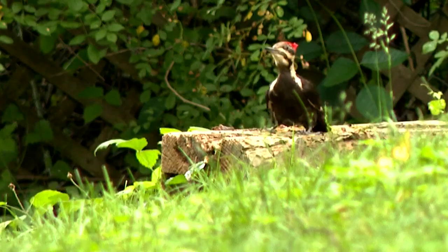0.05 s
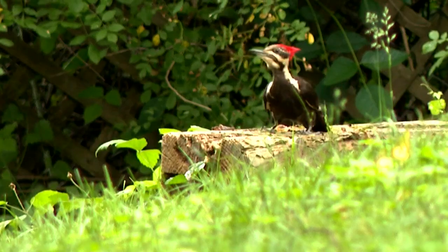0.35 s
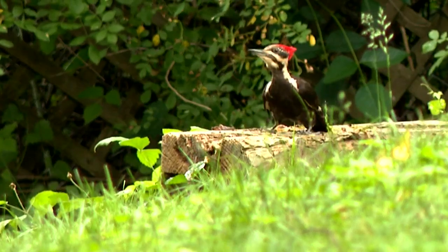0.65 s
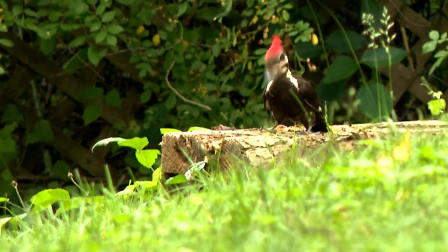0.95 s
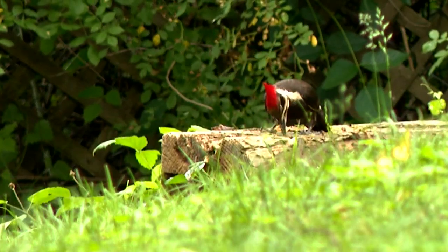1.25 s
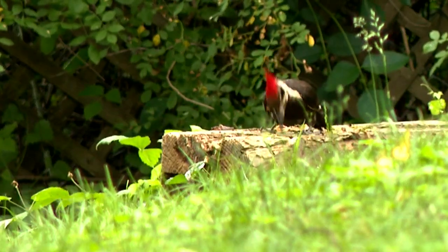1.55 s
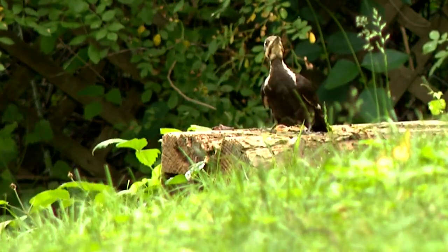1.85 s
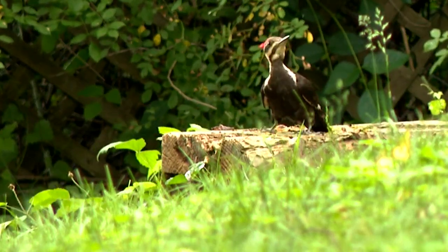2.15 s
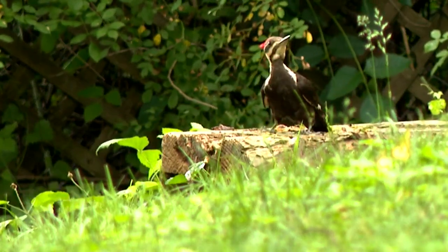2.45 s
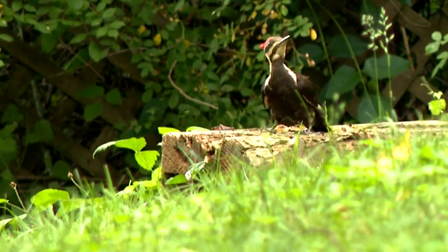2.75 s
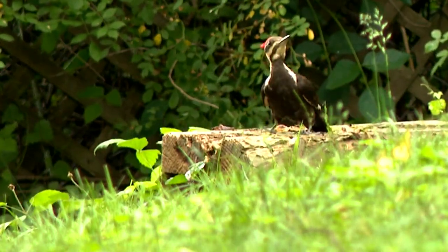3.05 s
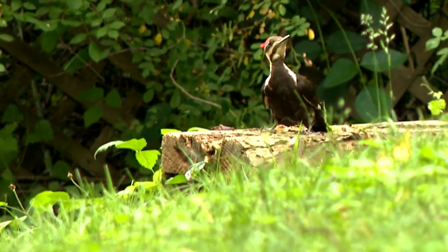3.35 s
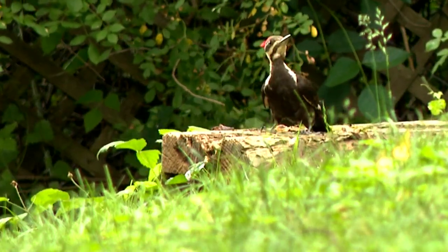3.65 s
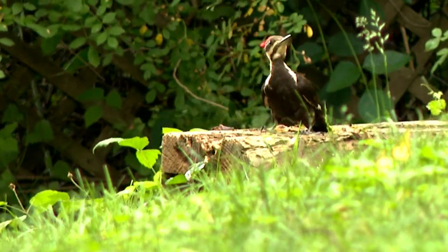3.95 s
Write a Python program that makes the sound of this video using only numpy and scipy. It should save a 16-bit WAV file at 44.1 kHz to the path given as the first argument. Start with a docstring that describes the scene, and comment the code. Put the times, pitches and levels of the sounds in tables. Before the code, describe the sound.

A small bird sings five quick, whistled phrases with raspy edges from about 0.3 to 1.5 seconds, echoing softly among trees. A woodpecker taps a stump once, lightly, near 1.9 seconds. Other birds give thin, high calls around 0.8, 1.7, 2.7 and 3.8 seconds. Bark and leaves rustle faintly now and then. Soft outdoor hiss, light wind rumble on the microphone and a faint distant hum continue throughout.

```python
"""Wren-like song among trees

A bird sings five quick phrases made of a rasp, a high arch, a rising note, a falling slur and a low link.
Foliage scatters the song into a soft tail. Small birds add thin high calls, bark and leaves rustle,
and a woodpecker taps once on a stump. Underneath lie outdoor hiss, light wind and a faint distant drone."""
import sys
import numpy as np
from scipy import signal
from scipy.fft import rfft, irfft
from scipy.io import wavfile
from scipy.ndimage import uniform_filter1d

SR = 44100
rng = np.random.default_rng(int(sys.argv[2]) if len(sys.argv) > 2 else 0)


def master(y):
    """Save y as 16-bit WAV."""
    cut = np.clip(np.atleast_2d(y).T, -1, 1)
    pcm = np.round(cut * 32767)  # scale
    wavfile.write(sys.argv[1], SR, pcm.astype(np.int16))


N = 176400  # 4 seconds
TOP_HZ = 15720  # upper limit of the sound


def amp(db):
    """Turns decibels into a number to multiply by."""
    return 10 ** (np.asarray(db) / 20)


def unit(x):
    """Scales a sound to an average strength (rms) of 1."""
    return x / np.sqrt(np.mean(x ** 2) + 1e-20)


def read(points, hz):
    """Looks up a value between a table's frequencies, spaced by octaves."""
    f, value = np.transpose(points)
    return np.interp(np.log(hz + 1), np.log(f + 1), value)


def add(mix, start_s, sound):
    """Mixes a sound in at the given time."""
    part = mix[max(round(start_s * SR), 0):][:len(sound)]
    part += sound[:len(part)]


def tint(x, colour):
    """Turns each frequency up or down as the colour table says."""
    return irfft(rfft(x) * amp(read(colour, np.fft.rfftfreq(len(x), 1 / SR))), len(x))


def noise(colour):
    """Steady noise with the given balance of low and high."""
    return unit(tint(rng.standard_normal(N), colour))


def drift(size, fastest_hz):
    """A smooth random wobble made of 12 sine waves."""
    f, t = np.geomspace(fastest_hz / 8, fastest_hz, 12)[:, None], np.arange(size) / SR
    return np.sin(2 * np.pi * (f * t + rng.random((12, 1)))).sum(0) / np.sqrt(len(f) / 2)


# Tone colour of the open air (frequency [Hz], level [dB])
HISS_COLOUR = [(35, -27), (55, -1), (100, -1), (160, -2.5), (230, -5.5), (400, -7.5), (750, -8),
               (1100, -12.5), (1600, -15.5), (2500, -16), (3900, -17), (5500, -19.5), (7200, -20),
               (8200, -24.5), (11000, -31.5), (15500, -39.5)]
def hiss():
    """Soft, almost steady outdoor hiss."""
    return amp(-56 + 0.22 * drift(N, 5)) * noise(HISS_COLOUR)


# Tone colour of the wind (frequency [Hz], level [dB])
WIND_COLOUR = [(3, 0.5), (10, 5.5), (20, 10), (32, -10.5), (50, -6.5), (100, -52), (300, -79)]
# Gusts and lulls (time [s], level [dB])
GUSTS = [(0, -53.5), (.3, -48.5), (.7, -54), (1.3, -51), (1.85, -49), (2.25, -57), (2.7, -47.5), (3.4, -56),
         (4, -47)]
def wind():
    """Light wind on the microphone makes a deep rumble."""
    gust_db = np.interp(np.arange(N) / SR, *np.transpose(GUSTS))
    return amp(gust_db) * noise(WIND_COLOUR)


# Tones of the drone (pitch [Hz], start level [dB], middle level [dB], end level [dB])
DRONE_TONES = [(57, -85, -83, -55.5), (85.8, -74, -68, -65), (119.2, -61.5, -71, -63.5),
               (174.6, -63.5, -81.5, -70), (202, -77, -67, -60.5), (306, -89, -80, -71),
               (392.5, -78, -81, -66)]
def drone():
    """A distant hum of low tones that wander in pitch and level."""
    out, t = np.zeros(N), np.arange(N) / SR
    for hz, *levels in DRONE_TONES:
        db = np.interp(t, np.linspace(0, t[-1], len(levels)), levels) + 2 * drift(N, 4)
        pitch = hz * (1 + 0.0118 * drift(N, 5))
        out += amp(db) * np.sin(2 * np.pi * np.cumsum(pitch) / SR)
    return out


# Overtone strength next to the main tone (frequency [Hz], level [dB])
BIRD_OVERTONES = [(3500, -40), (5000, -38), (7300, -28), (9000, -41), (10500, -36), (11200, -28.5),
                  (12200, -32), (13500, -26), (15500, -35)]
def whistle(hz, db, overtone_db=0, harmonics=3):
    """A bird's nearly pure, wavering tone, with weak overtones at multiples of its pitch."""
    waver, shimmer_db, fade_s = 0.0021, 1.2, 0.0014
    size = len(hz)
    t = np.arange(size) / SR
    phase = 2 * np.pi * np.cumsum(hz * (1 + waver * drift(size, 290))) / SR
    tone = np.sin(phase)
    for k in range(2, harmonics + 1):
        tone += amp(read(BIRD_OVERTONES, k * hz) + overtone_db) * (k * hz < TOP_HZ) * np.sin(k * phase)
    fade = np.sin(np.pi / 2 * np.clip(np.minimum(t, t[-1] - t) / fade_s, 0, 1))
    return tone * fade * amp(db + shimmer_db * drift(size, 252))


def notes(rows, shape, overtone_db=0, harmonics=6):
    """Sings one note shape for each row; overtones fade as the pitch drops below its peak."""
    fade_db_per_octave = 21
    out, (at, hz, db) = np.zeros(N), np.transpose(shape)
    for start, length, ratio, level_db in rows:
        progress = np.linspace(0, 1, int(length * SR))
        pitch = uniform_filter1d(np.interp(progress, at, hz), size=130, mode="nearest")  # round corners
        bright_db = overtone_db + fade_db_per_octave * np.log2(pitch / pitch.max())
        note_db = np.interp(progress, at, db) + level_db
        add(out, start, whistle(pitch * ratio, note_db, bright_db, harmonics))
    return out


# Leaves scatter the highest pitches most (frequency [Hz], level [dB])
LEAF_COLOUR = [(1500, -2), (2500, -2), (3700, 1), (8000, 0), (11000, 7.5), (15000, 7)]
# How long the trees echo (frequency [Hz], time to fade by 60 dB [s])
TREE_FADE = [(1500, 0.96), (2500, 0.6), (4000, 1), (8000, 0.67), (15000, 0.32)]
def foliage(x, near_db, near_fade_s, tail_db):
    """Adds quick echoes from nearby leaves and trunks, then a long soft tail from the trees."""
    t = np.arange(SR) / SR
    near, far = rng.standard_normal((2, SR)) * (rng.random((2, SR)) < .06) * np.minimum(t / 0.0082, 1)
    near = tint(unit(near * amp(-60 * t / near_fade_s)), LEAF_COLOUR)
    hz, at, bands = signal.stft(far, SR, nperseg=256)
    bands *= amp(-60 * at / read(TREE_FADE, hz)[:, None])
    tail = signal.istft(bands, SR, nperseg=256)[1][:SR]
    echo = amp(near_db) * near + amp(tail_db) * unit(tail)
    return x + signal.fftconvolve(x, echo / np.sqrt(SR))[:N]


# How each kind of note moves (progress [0 to 1], pitch [Hz], level [dB])
ARCH_CURVE = [(0, 3346, -3), (.1, 3674, 0.5), (.25, 3748, -5), (.42, 3733, 2.5), (.58, 3423, 1),
              (.72, 3110, 2.5), (.86, 2800, 0), (1, 2600, -12)]
RISE_CURVE = [(0, 2312, -15), (.17, 2281, -6.5), (.42, 2339, -6), (.66, 2480, -2.5), (.86, 2610, -2),
              (1, 2680, -17)]
SLUR_CURVE = [(0, 2917, -18), (.15, 3064, -7), (.36, 3002, -2.5), (.55, 2710, -1), (.75, 2410, -5.5),
              (.9, 2230, -8.5), (1, 2020, -14)]
LINK_CURVE = [(0, 1712, -12), (.2, 1847, -11), (.45, 2010, -7.5), (.6, 2095, -1.5), (.78, 1979, -5.5),
              (.9, 1843, -8), (1, 1690, -10)]
# When each kind is sung (start [s], length [s], pitch multiplier [ratio], level [dB])
ARCH_NOTES = [(.281, 0.031, 1.04, -46.5), (.556, 0.038, 1.001, -42.5), (.841, .033, 1.001, -40),
              (1.1215, .033, 1.001, -39.5), (1.402, 0.036, 0.98, -40)]
RISE_NOTES = [(.324, 0.025, 1.01, -38.5), (.601, .031, .995, -36), (.888, 0.033, .99, -36),
              (1.165, 0.0353, 1.01, -34), (1.449, 0.028, 1, -33)]
SLUR_NOTES = [(.374, 0.024, .975, -38.5), (.657, 0.024, .975, -41), (.942, 0.026, 1.001, -36),
              (1.219, .027, 1.001, -34), (1.502, 0.024, 1.005, -35)]
LINK_NOTES = [(.444, 0.051, 1, -43.5), (.727, 0.045, 1, -41), (1.003, .048, .97, -41.5),
              (1.29, 0.046, 1.033, -39.5)]
def song():
    """The bird whistles an arch, a rise and a slur five times, with a low link between phrases."""
    out = notes(ARCH_NOTES, ARCH_CURVE, overtone_db=3, harmonics=3)
    out += notes(RISE_NOTES, RISE_CURVE, overtone_db=-4)
    out += notes(SLUR_NOTES, SLUR_CURVE, overtone_db=-3, harmonics=4)
    out += notes(LINK_NOTES, LINK_CURVE, overtone_db=1, harmonics=7)
    entry_s, entry_db = 0.017, -5.5  # the very first note swells in
    sung_s = np.arange(N) / SR - ARCH_NOTES[0][0]
    out *= amp(entry_db * (1 - np.clip(sung_s / entry_s, 0, 1) ** 2))
    return foliage(out, near_db=-9, near_fade_s=0.19, tail_db=-6.5)


# Small scrapes (start [s], length [s], level [dB])
SCRAPES = [(0.465, 0.021, -59), (0.924, 0.023, -53.5), (1.32, 0.013, -65), (1.715, 0.075, -61),
           (1.76, 0.15, -63), (2.612, 0.017, -62.5), (2.63, .016, -74), (2.973, 0.099, -75),
           (3.227, .11, -66), (3.873, 0.044, -70)]
# Their tone colour (frequency [Hz], level [dB])
SCRAPE_COLOUR = [(300, -20), (1100, -5), (1600, 16), (2000, -2), (3000, -3), (7000, 1), (10000, -3.5),
                 (14000, -4), (16000, -18)]
def rustles():
    """Dry bark and leaves scrape in short, grainy puffs of noise."""
    swells, grain_db = np.zeros(N), 2.8
    for start, length, db in SCRAPES:
        add(swells, start, amp(db) * np.sin(np.linspace(0, np.pi, int(length * SR))))
    return swells * noise(SCRAPE_COLOUR) * amp(grain_db * drift(N, 500))


# Rasps that open every phrase after the first (start [s], level [dB])
RASP_TIMES = [(0.535, -51.5), (.816, -48.5), (1.098, -47), (1.377, -49)]
# Tone colour of their dry, hissy edge (frequency [Hz], level [dB])
EDGE_COLOUR = [(2000, -35), (4500, -5), (7000, -4), (9000, -12), (11000, -8), (12000, -2.5), (13200, -16),
               (15500, -21)]
def rasps():
    """The bird overlaps four rough up-and-over chirps, each a little lower, with a puff of hiss."""
    chirp_s, spacing_s, roughness = 0.01386, 0.0047, .06
    low_hz, top_hz, sink_hz = 3015, 5180, 220
    edge_db, edge_s = -13, 0.033
    chirps, edge = np.zeros((2, N))
    progress = np.linspace(0, 1, int(chirp_s * SR))
    swell_db = -10 * (1 - np.sin(np.pi * progress))
    for start, db in RASP_TIMES:
        add(edge, start, amp(db + edge_db) * np.sin(np.linspace(0, np.pi, int(edge_s * SR))))
        for k in range(4):
            hz = low_hz + (top_hz - k * sink_hz - low_hz) * np.sin(2.27 * progress)
            hz *= 1 + roughness * drift(len(hz), 900)
            add(chirps, start + k * spacing_s, whistle(hz, db + swell_db, overtone_db=-2))
    return foliage(chirps + edge * noise(EDGE_COLOUR), near_db=-5.5, near_fade_s=0.15, tail_db=-6)


def glides(rows, roughness=0):
    """Straight pitch slides that swell and fade; roughness shakes the pitch into a buzz."""
    out = np.zeros(N)
    for start, length, first_hz, last_hz, db in rows:
        progress = np.linspace(0, 1, int(length * SR))
        hz = first_hz + (last_hz - first_hz) * progress
        hz *= 1 + roughness * drift(len(hz), 913)
        add(out, start, whistle(hz, db - 9 * (1 - np.sin(np.pi * progress))))
    return out


# How a short "tsip" moves (progress [0 to 1], pitch [Hz], level [dB])
TSIP_CURVE = [(0, 6700, -7), (.2, 7100, -6), (.45, 7540, -2), (.7, 7440, -1.5), (1, 6950, -10)]
# Near and far tsips (start [s], length [s], pitch multiplier [ratio], level [dB])
NEAR_CALLS = [(.798, 0.0217, 0.996, -48.5), (2.701, 0.0272, .995, -48.5)]
FAR_CALLS = [(2.11, .04, .96, -72), (2.18, 0.042, .94, -67), (3.235, 0.032, .95, -68),
             (3.895, 0.017, .89, -64)]
# Buzzy endings (start [s], length [s], first pitch [Hz], last pitch [Hz], level [dB])
BUZZY_FALLS = [(.814, 0.021, 7100, 4570, -55), (2.72, .018, 7300, 5770, -56),
               (2.728, .022, 6000, 3410, -59.5), (3.95, 0.0218, 6800, 5700, -59.5)]
def short_calls():
    """Small birds call "tsip", some ending in a falling buzz; the far calls are mostly echo."""
    near = notes(NEAR_CALLS, TSIP_CURVE) + glides(BUZZY_FALLS, roughness=.08)
    out = foliage(near, near_db=-7, near_fade_s=0.19, tail_db=-0.5)
    return out + foliage(notes(FAR_CALLS, TSIP_CURVE), near_db=3.5, near_fade_s=0.22, tail_db=4)


# How a high, sinking "seep" moves (progress [0 to 1], pitch [Hz], level [dB])
SEEP_CURVE = [(0, 8700, -10), (.15, 8830, -3), (.4, 8620, -5), (.62, 8630, -0.5), (.78, 8220, 0),
              (.9, 7780, -10), (1, 7330, -2)]
# The seeps (start [s], length [s], pitch multiplier [ratio], level [dB])
SEEP_NOTES = [(1.698, 0.13, 0.992, -55), (3.757, .078, 0.964, -52.5)]
# Distant whistles (start [s], length [s], first pitch [Hz], last pitch [Hz], level [dB])
FAR_WHISTLES = [(3.55, .12, 6560, 6520, -68), (3.68, .12, 6100, 6470, -67),
                (3.565, 0.077, 2700, 2900, -59.5), (3.65, .11, 2400, 2440, -69)]
def long_calls():
    """Small birds draw out thin "seep" calls and faint whistles."""
    calls = notes(SEEP_NOTES, SEEP_CURVE) + glides(FAR_WHISTLES)
    return foliage(calls, near_db=-16, near_fade_s=0.13, tail_db=-5)


# Bill hits, so close that they sound like one tap (time [s], level [dB])
BILL_HITS = [(1.862, -42.5), (1.8638, -40), (1.8675, -48), (1.872, -58)]
# Tones the stump rings with (pitch [Hz], level [dB], time to fade by 60 dB [s])
STUMP_TONES = [(1310, -24, 0.012), (1540, -8, 0.014), (1820, -9, .016), (2010, 5, 0.015), (2320, -3, 0.014),
               (2680, -12, 0.018), (3150, -3.5, 0.023), (3400, -8, .018), (5350, -10, .008)]
def woodpecker():
    """The bill strikes dead wood and chatters briefly, making the stump ring."""
    out, t, rise_s = np.zeros(N), np.arange(4096) / SR, 0.00047
    ring = sum(amp(db - 60 * t / fade_s) * np.sin(2 * np.pi * hz * t) for hz, db, fade_s in STUMP_TONES)
    for start, db in BILL_HITS:
        add(out, start, amp(db) * ring * np.minimum(t / rise_s, 1))
    return foliage(out, near_db=-7, near_fade_s=0.047, tail_db=-22)


def scene():
    """Mixes the birds and their surroundings into one channel."""
    birds = song() + rasps() + long_calls() + short_calls() + woodpecker()
    return (birds + rustles() + hiss() + wind() + drone())[None]


def record(dry):
    """Starts with a moment of silence and cuts off the very highest treble."""
    silence_s = .036
    live = dry * (np.arange(N) >= silence_s * SR)
    treble_cut = signal.firwin(511, TOP_HZ, window=("kaiser", 9), fs=SR)
    return signal.oaconvolve(live, treble_cut[None], "same")


dry = scene()
out = record(dry)
master(out)
```